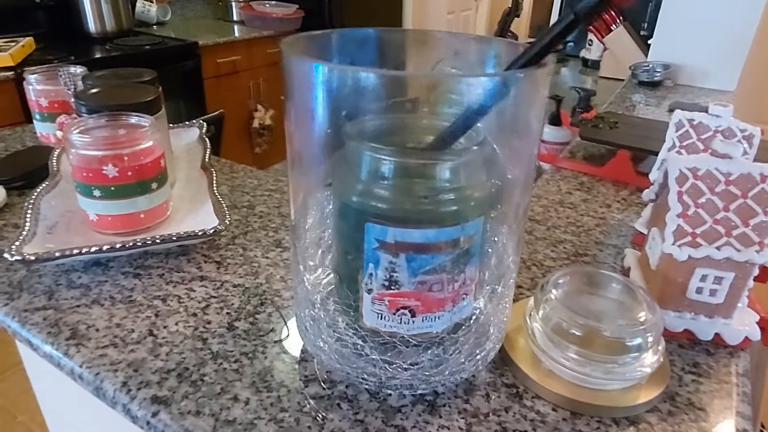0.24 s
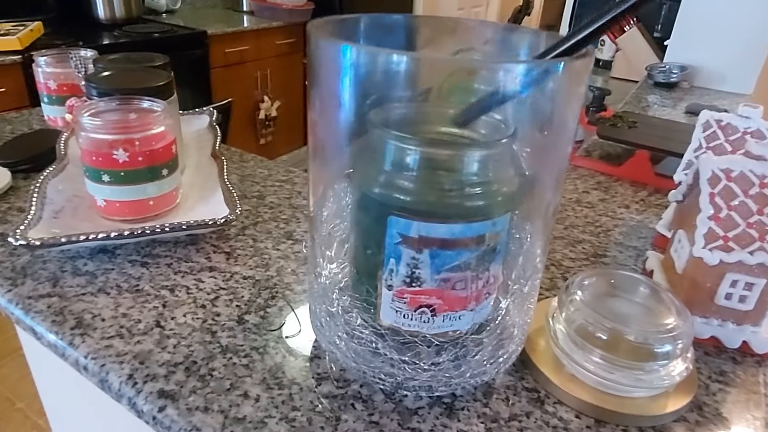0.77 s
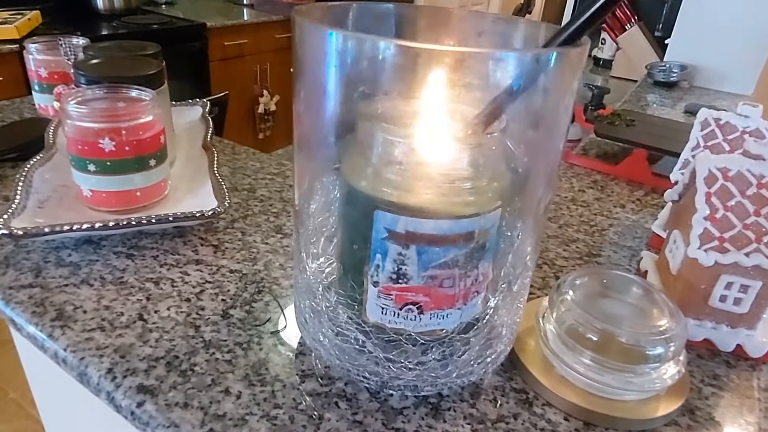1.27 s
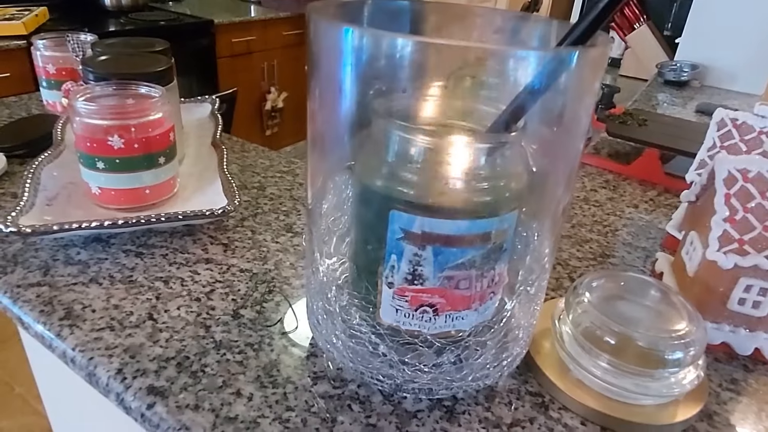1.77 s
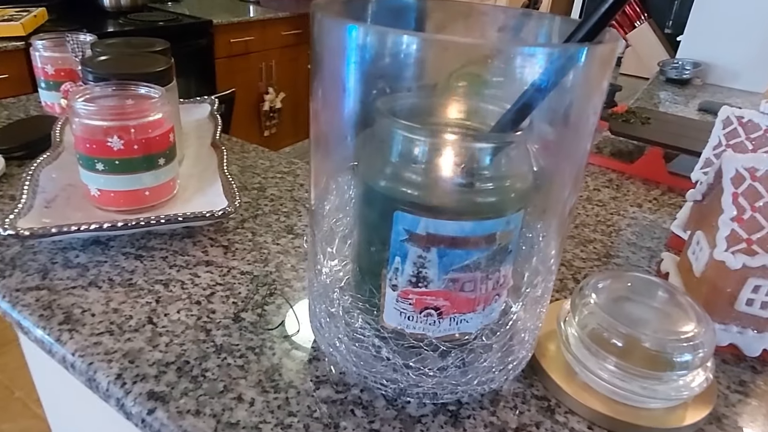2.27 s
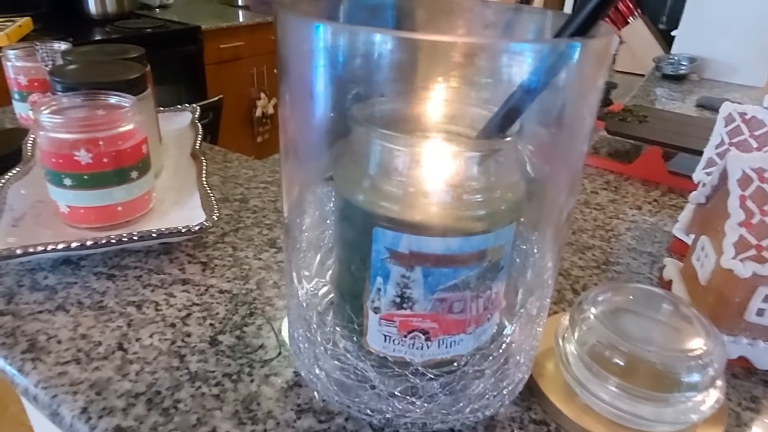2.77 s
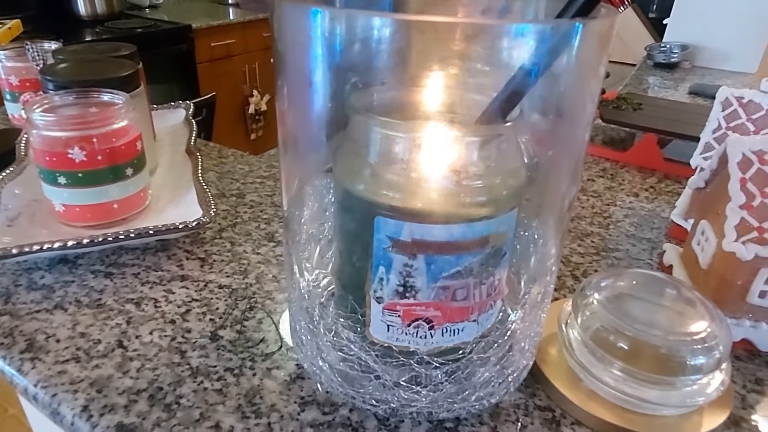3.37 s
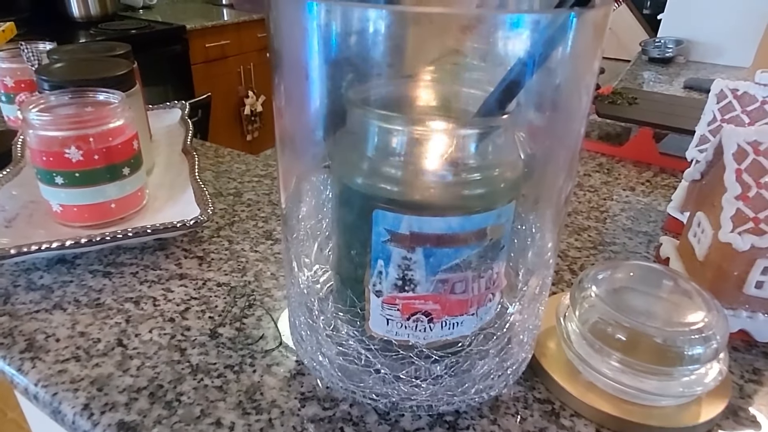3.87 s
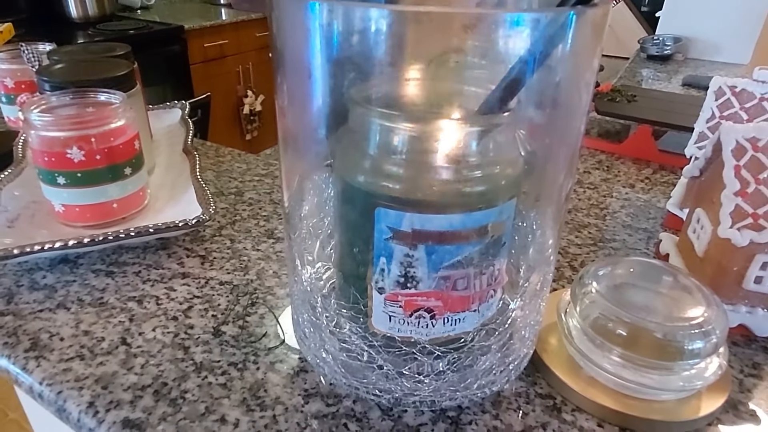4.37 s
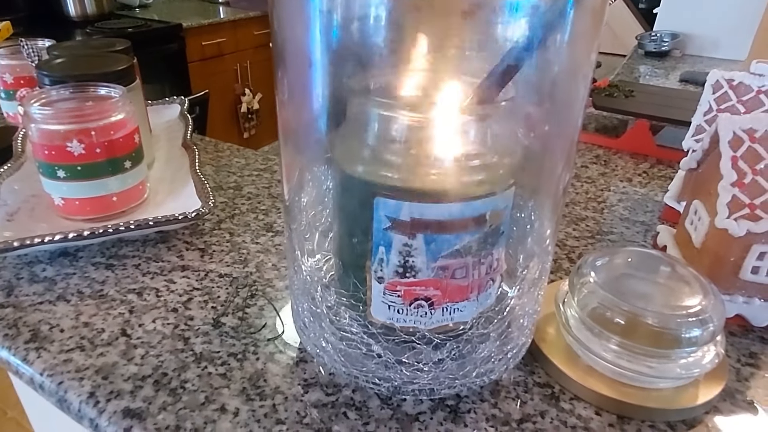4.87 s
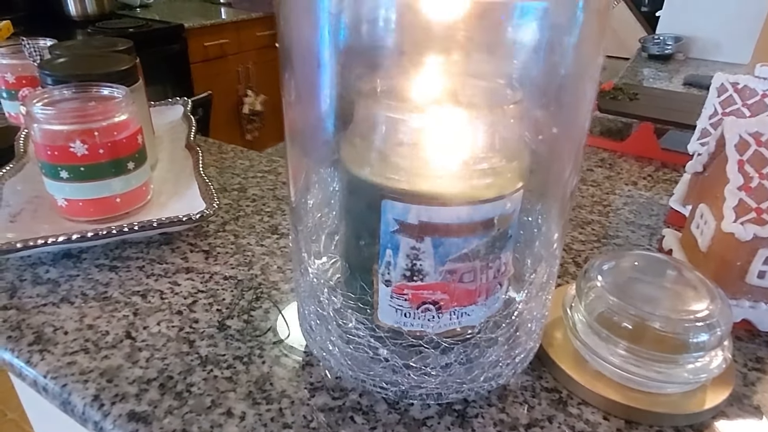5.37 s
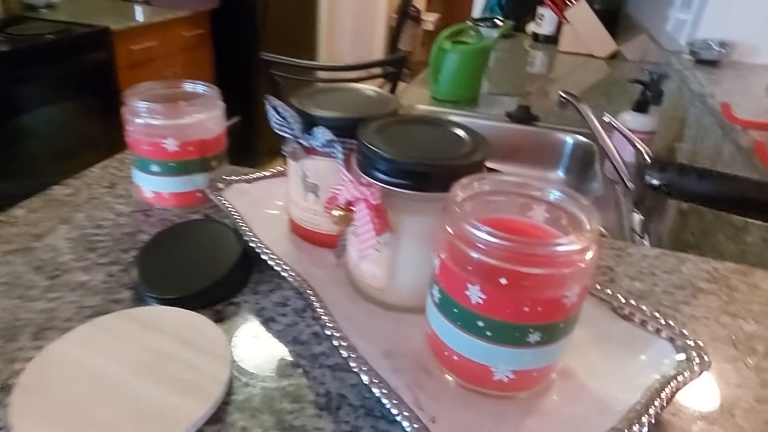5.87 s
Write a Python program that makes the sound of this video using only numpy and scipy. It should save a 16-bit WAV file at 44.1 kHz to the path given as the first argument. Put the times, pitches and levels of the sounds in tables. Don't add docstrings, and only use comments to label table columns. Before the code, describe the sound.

Two loud plastic lighter clicks and bright glass knocks, then near quiet with fridge hum, tiny spring creaks and a late hand rub and thump.

```python
import sys
import numpy as np
from scipy import signal
from scipy.fft import rfft, irfft
from scipy.io import wavfile
from scipy.ndimage import uniform_filter1d

SR = 44100
rng = np.random.default_rng(int(sys.argv[2]) if len(sys.argv) > 2 else 0)


def natural_amplitude(level_db):
    exponent = np.asarray(level_db, float) / 20
    return 10 ** exponent


def put_to_file(sound):
    columns = np.atleast_2d(sound).T
    safe = np.clip(columns, -1, 1)
    whole_steps = np.round(safe * 32767)
    wavfile.write(sys.argv[1], SR, whole_steps.astype(np.int16))


N = 270333
TIME = np.arange(N) / SR
FRAME_S = np.arange(N // 256 + 5) * 256 / SR
BINS = np.fft.rfftfreq(1024, 1 / SR)[:, None]
SIDES = np.array([[0.5], [-0.5]])


def evened(x):
    return x / np.sqrt(np.mean(x ** 2) + 1e-20)


def read(points, hz):
    f, value = np.transpose(points)
    return np.interp(np.log(hz + 1), np.log(f + 1), value)


def add(mix, s, sound):
    part = mix[:, round(s * SR):][:, :sound.shape[1]]
    part += sound[:, :part.shape[1]]


def ring(hz, db, t60, pan_db=0., lead=0., rise_s=0.00056):
    t = np.arange(int(SR * np.max(t60) * 1.2)) / SR
    gain = natural_amplitude(db + SIDES * pan_db) / np.linalg.norm(natural_amplitude(db))
    gain = gain * np.exp(1j * SIDES * lead)
    waves = np.exp(np.outer(2j * np.pi * hz - np.log(1000) / t60, t))
    return (gain @ waves).imag * (1 - np.exp(-t / rise_s))


def noise(shape_db, same, pan_db, patchy_db):
    a, b, c, d, patches = rng.standard_normal((len(FRAME_S), 513, 5)).T
    patches = uniform_filter1d(patches, size=8, axis=0)
    patches = evened(uniform_filter1d(patches, size=20, axis=1))
    left, own = a + 1j * b, c + 1j * d
    right = same * left + np.sqrt(1 - same ** 2) * own
    z = np.array([left * natural_amplitude(pan_db / 2), right / natural_amplitude(pan_db / 2)])
    z = z * natural_amplitude(shape_db + patchy_db * patches)
    return evened(signal.istft(z, nperseg=1024, noverlap=768)[1][:, :N])


def room_air():
    # (frequency [Hz], level [dB per Hz])
    rumble = [(12, -42), (20, -13), (43, -7), (70, -8), (114, -4), (135, -3.5), (173, -10), (232, -3),
              (409, -5), (677, -23), (1240, -28), (1410, -33), (3000, -42), (3900, -69), (6600, -120)]
    # (frequency [Hz], likeness [-1 to 1])
    likeness = [(60, 0.8), (180, 0.8), (550, 0.93), (1650, -0.00015), (4970, -0.03), (15000, -0.01)]
    # (frequency [Hz], left-right difference [dB])
    air_pan = [(60, -4), (180, -8), (550, -1.5), (1650, 0), (4970, 0), (15000, 1)]
    # (middle [s], rise [dB], half length [s])
    swells = [(.3, 5.5, .25), (.86, 14, .28), (1.452, 3, .2), (2.571, 7.5, .2), (3.62, 3, .3),
              (4.56, 5.5, .3), (5.748, 6, .3)]
    swell_db = sum(db * np.exp(-((FRAME_S - s) / half) ** 2) for s, db, half in swells)
    reach = np.clip((BINS - 100) / 150, 0, 1)
    shape_db = read(rumble, BINS) + reach * (swell_db - 2.5)
    return natural_amplitude(-65.0) * noise(shape_db, read(likeness, BINS), read(air_pan, BINS), 1.2)


def fridge():
    # (frequency [Hz], phase [rad])
    tones = [(57.76, .25), (115.52, 3.98), (119.98, 2.82), (231.12, 1.2), (346.6, 4.47)]
    tone_db = (-75, -72.5, -70, -72, -83)
    hum = sum(natural_amplitude(db) * np.sin(2 * np.pi * hz * TIME + phase) for (hz, phase), db in zip(tones, tone_db))
    return hum * natural_amplitude(-4.4 * SIDES)


def microphone_hiss():
    # (frequency [Hz], level [dB per Hz])
    hiss = [(880, -28), (1500, 2), (1740, -5), (1980, -4), (2490, -3.5), (7240, -10.5), (10600, -10),
            (15100, -4.5), (16000, -10)]
    return natural_amplitude(-83) * noise(read(hiss, BINS), 0, .8, .3)


def kitchen(x):
    # (frequency [Hz], time to fall 60 dB [s])
    fading = [(200, .4), (600, 0.4), (1500, 0.41), (4000, 0.33), (10000, 0.34), (16000, 0.24)]
    count = SR // 40
    echoes = np.zeros((2, SR // 2 + 200))
    at = 150 + 20 * np.arange(count) + rng.integers(0, 20, (2, count))
    np.put_along_axis(echoes, at, rng.choice([-1., 1.], at.shape), axis=1)
    hz, t, z = signal.stft(echoes, SR, nperseg=128)
    z = z * natural_amplitude(-60 * t / read(fading, hz)[:, None])
    tail = signal.istft(z, SR, nperseg=128)[1]
    return signal.fftconvolve(x, tail / np.linalg.norm(tail[0]), axes=1)[:, :N]


def skin_slide():
    # (middle [Hz], width [octaves], full from [s], hold [s], level [dB])
    skin = [
        (2180, 0.24, 5.58, 0.085, -75),
        (4770, 0.52, 5.59, .19, -81),
        (9280, 0.36, 5.62, .24, -87),
    ]
    # (frequency [Hz], left-right difference [dB])
    slide_pan = [(60, -6.5), (110, -5.5), (200, -4), (380, -4), (700, -2.0), (1290, -0.5), (2380, 9),
                 (4400, 16), (8120, -5), (15000, 8)]
    power = 0
    for hz, width, s, hold, db in skin:
        before, after = np.maximum(s - FRAME_S, 0), np.maximum(FRAME_S - s - hold, 0)
        level_db = db - 163 * before - 200 * after
        band = np.exp(-(np.log2((BINS + 1) / hz) / width) ** 2)
        power = power + natural_amplitude(2 * level_db) / (hz * width) * band
    return natural_amplitude(-86.0) * noise(10 * np.log10(power + 1e-30), 0.22, read(slide_pan, BINS), 3.0)


def grip():
    # (frequency [Hz], level [dB per Hz])
    grip_tone = [(24, -38), (40, -5.5), (113, -5), (230, -1.5), (476, -15), (526, -17.5), (598, -23),
                 (1200, -39), (1560, -52), (2640, -120)]
    start_s = 5.915
    settle = natural_amplitude(-33.5 - 194 * np.maximum(TIME - start_s, 0)) + natural_amplitude(-56.5)
    rise = np.clip((TIME - start_s) / 0.013 + 1, 0, 1)
    return noise(read(grip_tone, BINS), 0.92, -2.5, 1.3) * settle * rise


def bumps():
    # (time [s], level [dB], frequency [Hz], time to fall 60 dB [s], overtone [dB])
    pushes = [(.092, -40, 135, 0.041, -4.5), (0.751, -42, 188, 0.071, 0), (.983, -39.5, 91, 0.1, -1),
              (1.029, -22.5, 107, 0.034, 18), (1.039, -25, 123.3, 0.13, -4), (1.083, -34.5, 132, 0.057, 2),
              (4.481, -55.5, 217.4, 0.069, -6), (4.557, -50.5, 141, 0.16, 16),
              (5.868, -44.5, 167, 0.08, -3), (5.884, -32, 180, 0.048, 8.5), (5.894, -12.5, 211, 0.036, -26),
              (5.909, -16.5, 128, 0.035, -4), (5.929, -26, 105.6, 0.068, -22),
              (5.947, -31.5, 80.5, 0.096, -9), (6.009, -35, 147, .05, -8), (6.039, -33, 131, 0.055, -4)]
    out = np.zeros((2, N))
    for s, db, hz, t60, over_db in pushes:
        swing_hz, swing_t60 = hz * np.array([1, 3.3]), t60 * np.array([1, .6])
        add(out, s, natural_amplitude(db) * ring(swing_hz, np.array([0, over_db]), swing_t60, -1.2, .1, .002))
    return out


def taps(events, modes, pan_db):
    out, (hz, db, t60) = np.zeros((2, N)), np.transpose(modes)
    lead = rng.uniform(1, 1.1, len(hz))
    for s, tap_db, tilt_db in events:
        tone_db = db + tilt_db * np.log2(hz / 2000)
        add(out, s, natural_amplitude(tap_db) * ring(hz, tone_db, t60, pan_db, lead))
    return out


def trigger_creaks():
    # (time [s], level [dB], brightness [dB per octave])
    creaks = [(4.0492, -74.5, 1.5), (4.1694, -79, -1), (4.1894, -71, 2.5), (4.2494, -81, 1.5),
              (4.2894, -78.5, 1), (4.3316, -62, 2), (4.4782, -59.5, 3), (4.5194, -74, 1.5),
              (4.5534, -56, 0), (4.6192, -77, 3), (4.6683, -69, 1.5), (4.7331, -64, 4), (4.8983, -64, 2.5),
              (5.0335, -51, -2), (5.9652, -43.5, 3), (6.033, -49.5, 2), (6.0886, -61, 10.5)]
    # (frequency [Hz], level [dB], time to fall 60 dB [s])
    spring = [(513, -7, .03), (766, -11, 0.034), (1027, 2, 0.037), (1290, -2.5, 0.038), (1564, -0.9, 0.099),
              (1620, -13, 0.015), (5440, -19, 0.029), (12900, -12, 0.0066), (14000, -10, 0.011),
              (15200, -10, 0.0069)]
    return taps(creaks, spring, 4.7)


def jar():
    # (time [s], level [dB], brightness [dB per octave])
    touches = [(1.4085, -46.5, -1), (1.6008, -70, -4), (1.9897, -61, -2), (2.699, -52.5, -1),
               (4.5644, -67.5, -14), (5.0672, -56, 8)]
    # (frequency [Hz], level [dB], time to fall 60 dB [s])
    jar_tones = [(1160, -19, 0.22), (1550, -21, 0.12), (2080, -16.5, 0.21), (2350, -9, 0.038),
                 (2580, -6, 0.076), (2970, -10.5, 0.085), (3295, -7.5, 0.032), (3630, 0.3, 0.022),
                 (8500, -17, 0.06), (9000, -13, 0.033), (9500, -7, .012), (11120, -16, 0.024)]
    return taps(touches, jar_tones, 6.5)


def vase():
    tone_hz = (340, 430, 641, 780, 1172, 1669, 1690, 2937, 3338, 3458, 3896, 3997, 4318, 4400, 5432, 6325,
               7120, 8770, 10300, 11600)
    # (level [dB], time to fall 60 dB [s], left-right difference [dB], left lead [rad])
    tones = [(-16, 0.094, 1, 0.23), (-14, .08, 1.5, -0.2), (-3.5, 0.055, 8.5, 2.08), (-14, .05, 6.5, -1.5),
             (-12.5, 0.22, 3.5, 0.93), (-5, 0.14, -5.5, -2.1), (-8, 0.27, -2.5, -2),
             (-19.5, .15, -1.5, -1.43), (-14.5, .08, -2.5, -1.5), (-3, .085, -6.5, 2),
             (-8.5, 0.097, 7.5, -0.5), (-7.5, 0.075, 11, 0.5), (-18, 0.1, 7, -1), (-10, 0.13, 8, 2.5),
             (-22, 0.12, 6.5, -1.5), (-27, 0.041, 7.5, -0.94), (-29.5, .1, 6.5, -0.75),
             (-33, 0.11, 3, -5.5), (-31, .05, 7, -5), (-36, .07, 5.5, -2.78)]
    # (time [s], level [dB], low ring [dB], high ring [dB], hardness [dB])
    clinks = [
        (0.169, -27, -8.5, -1, -2.5),
        (0.6448, -18, -4.5, -6.5, 0.5),
        (0.7493, -14.5, -2, -3, -1.5),
        (.826, -28.5, 1, 4, -2.5),
        (0.936, -51.5, 2, 4.5, -14),
        (.983, -28.5, -3.5, 0.5, -8),
        (1.085, -38, -3, -2, -8.5),
        (1.2319, -25, 1.5, -2, 4.5),
    ]
    place_hz = (600, 1170, 1680, 3400, 3900)
    out, hz, (db, t60, pan_db, lead) = np.zeros((2, N)), np.array(tone_hz), np.transpose(tones)
    scatter_db = 1.5 * rng.standard_normal((len(clinks), len(tones)))
    for (s, blow_db, low_db, high_db, hard_db), luck_db in zip(clinks, scatter_db):
        knock_db = -0.46 - 0.37 * hard_db
        place_db = np.interp(hz, place_hz, (knock_db, low_db, high_db, 0, hard_db))
        total = np.linalg.norm(natural_amplitude(db + place_db)) / np.linalg.norm(natural_amplitude(db))
        add(out, s, natural_amplitude(blow_db) * total * ring(hz, db + place_db + luck_db, t60, pan_db, lead))
    return out


def snaps(tables, kinds):
    # (frequency [Hz], width [Hz], level [dB])
    body_tones = [(1481, 630, 3), (2420, 420, -1), (3600, 1000, 2), (5700, 1000, 2), (8130, 1500, -6),
                  (10580, 1700, 0), (13500, 2400, 2)]
    out, feed = np.zeros((2, N)), np.zeros((2, N))
    t, hz = np.arange(1024) / SR, BINS[:, 0]
    body = 0
    for k, (f, width, db) in enumerate(body_tones):
        body = body + (-1) ** k * natural_amplitude(db) * 1j * hz * width / (f ** 2 - hz ** 2 + 1j * hz * width)
    events = sorted((*row, *kind) for rows, kind in zip(tables, kinds) for row in rows)
    draws = rng.standard_normal((len(events), 3, 1024))
    draws = draws * abs(draws) ** .25
    for (s, db, pan_db, tilt_db, ms, echo_db), (both, left, right) in zip(events, draws):
        u = t / (ms / 1000)
        rattle = np.array([np.roll(both, 5) + .4 * left, both + .4 * right])
        rattle = rattle * u * np.exp(-u ** 1.4)
        colour = body * hz / (hz - 1j * 1100) * natural_amplitude(tilt_db * np.log2((hz + 100) / 4000))
        snap = irfft(rfft(rattle) * colour)
        snap = snap / np.linalg.norm(snap, axis=1)[:, None]
        snap = natural_amplitude(db) * snap / abs(snap).max() * natural_amplitude(SIDES * pan_db)
        add(out, s, snap)
        spread = np.roll(irfft(colour), 40)
        strength = np.linalg.norm(snap, axis=1)[:, None]
        add(feed, s, natural_amplitude(echo_db) * strength * spread / np.linalg.norm(spread))
    return out, feed


def trigger_ticks():
    # (time [s], level [dB], left-right difference [dB], brightness [dB per octave])
    sparks = [(4.3315, -66, 6, 4), (4.4782, -61, 7.5, 4), (4.6683, -66, 6, 5), (4.6767, -64, 6.5, 5),
              (4.7331, -61, 8, 4), (4.8987, -61, 4.5, 3.5)]
    # (rattle length [ms], echo [dB])
    spark_kind = [(.6, -14)]
    return snaps([sparks], spark_kind)[0]


def lighter():
    # (time [s], level [dB], left-right difference [dB], brightness [dB per octave])
    clicks = [
        (0.0908, -3.5, 3.5, 0.4),
        (.592, -19, 1.5, -3.5),
        (0.982, -4.5, 2.5, -0.37),
        (1.406, -50, 2, .3),
        (1.989, -65, 1, -1),
        (2.699, -61, 1.1, 0),
        (4.5535, -60, 9, 8),
        (5.0666, -39, 3, -0.4),
        (5.895, -23, 11.5, -1.5),
        (5.976, -38, 4, 0.5),
    ]
    scrapes = [(0.026, -64, -4, -11), (0.171, -33, -2.5, -6), (0.6434, -25.5, 5, -3),
               (0.7473, -23, 4, -2.5), (1.232, -28.5, 3, 3)]
    shielded = [(.036, -54.5, 10, -4.5), (.068, -48, -5, -2), (0.336, -42, 2.5, -1), (0.5, -52, 1.5, -6.5),
                (0.549, -47.5, 0.8, -6), (.826, -26.5, 0.25, -3), (5.867, -52, 14.5, -4),
                (5.882, -53.5, 4, -1.5), (5.951, -41.5, 3.5, -6)]
    close = [(0.051, -54.5, -9, -3.5), (0.5883, -31, 5, -5.5), (0.623, -33, 4, -2.1), (1.083, -34, 0, -4),
             (6.000, -34.5, -16.5, -0.5), (6.006, -20.5, -13, 2), (6.102, -51.5, -13.5, -8.5)]
    # (rattle length [ms], echo [dB])
    kinds = [
        (1.25, -10),
        (4.5, -15.5),
        (1.7, -4),
        (0.73, -21),
    ]
    return snaps((clicks, scrapes, shielded, close), kinds)


def scene():
    background = room_air() + fridge() + microphone_hiss()
    handling = skin_slide() + grip() + bumps()
    rings = vase() + jar() + trigger_creaks()
    contacts, feed = lighter()
    echoes = kitchen(natural_amplitude(-13.5) * rings + feed)
    return background + handling + rings + contacts + echoes + trigger_ticks()


def top_cut(x):
    return signal.sosfilt(signal.butter(12, 16860, fs=SR, output="sos"), x)


def record(dry):
    cut = signal.lfilter(*signal.butter(2, 45, "high", fs=SR), dry)
    edge = signal.firwin(255, 15900, window=("kaiser", 7), fs=SR)
    return top_cut(signal.oaconvolve(cut, edge[None], "same"))


dry = scene()
out = record(dry)
put_to_file(out)
```